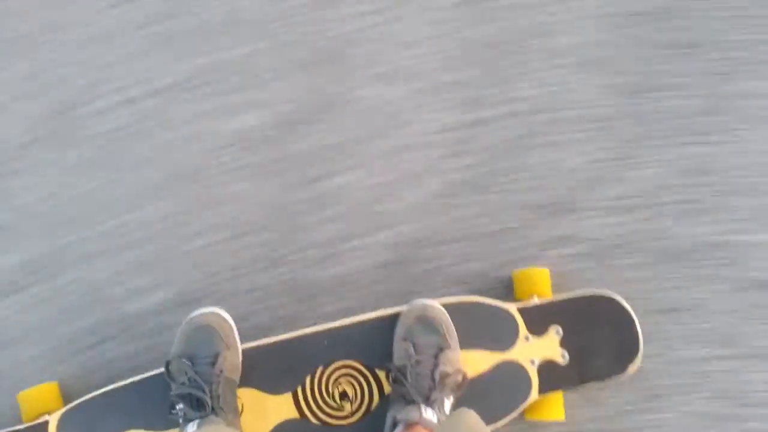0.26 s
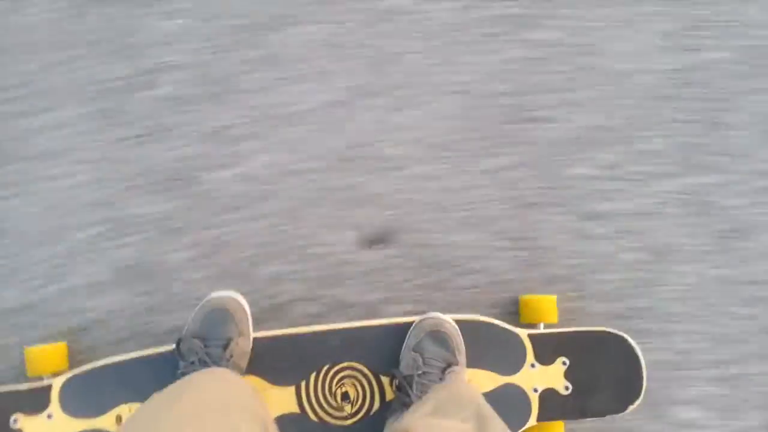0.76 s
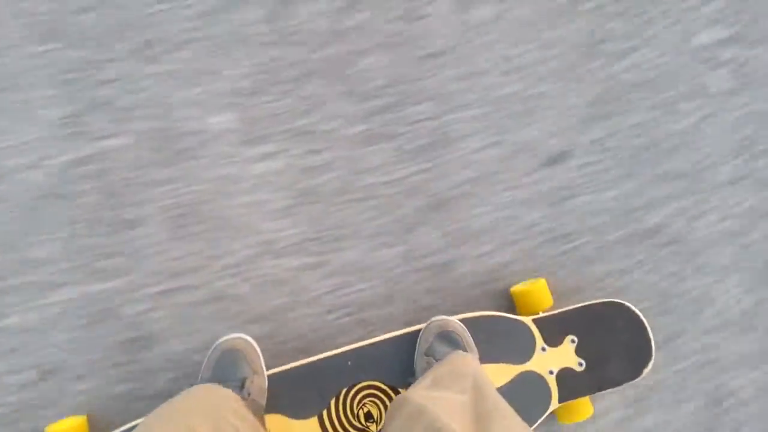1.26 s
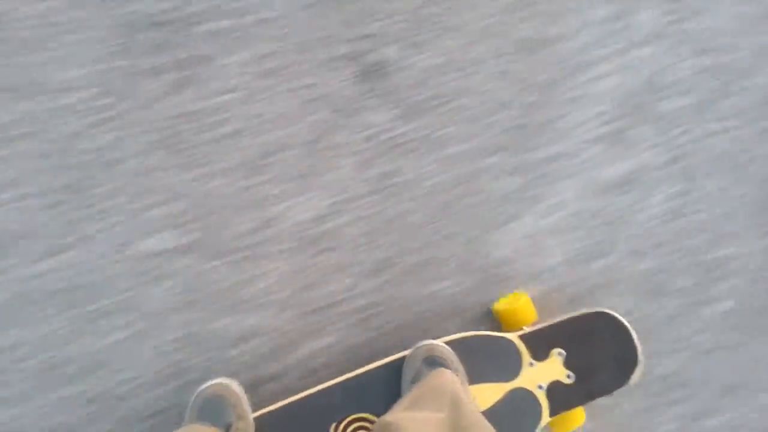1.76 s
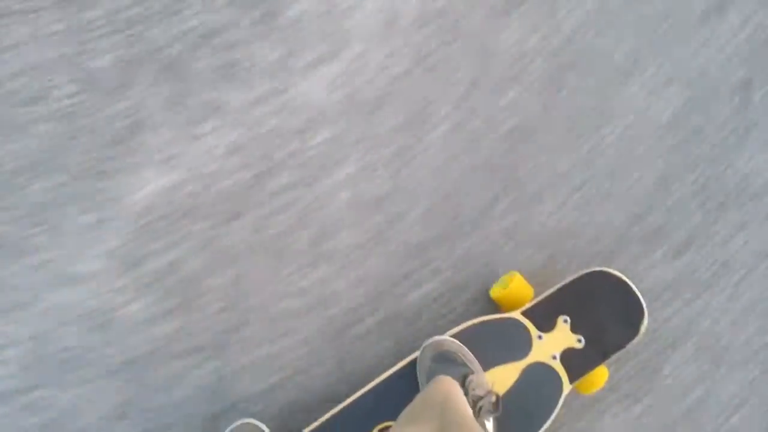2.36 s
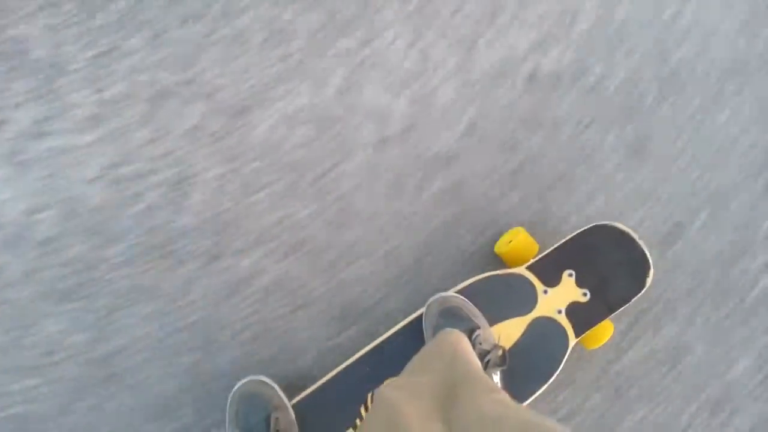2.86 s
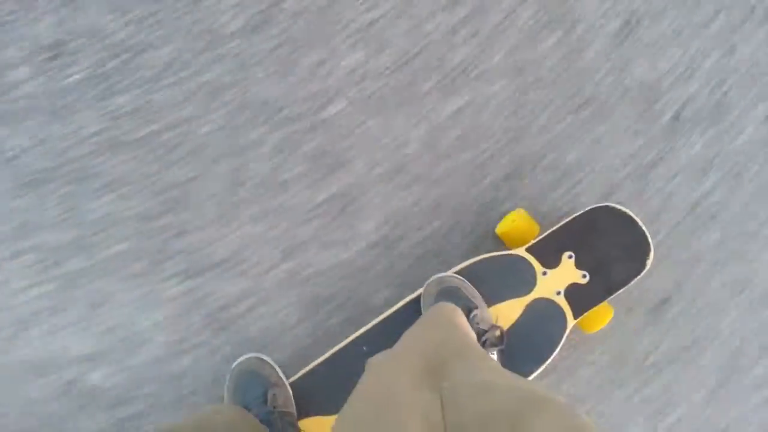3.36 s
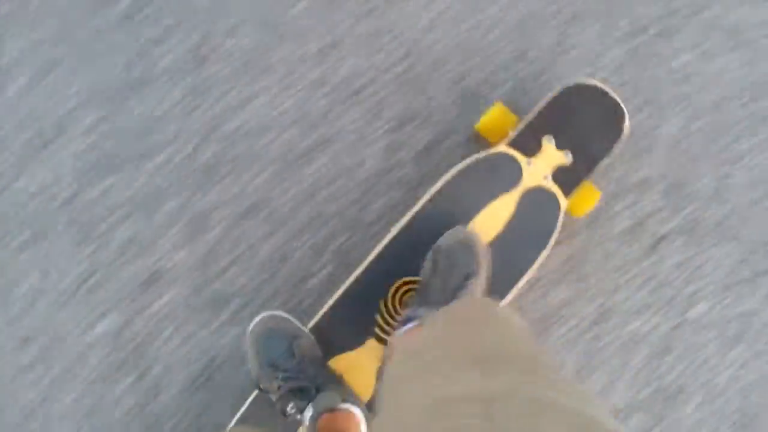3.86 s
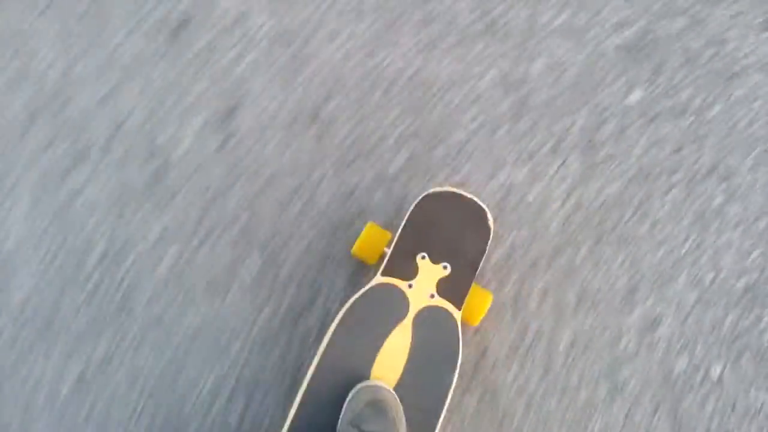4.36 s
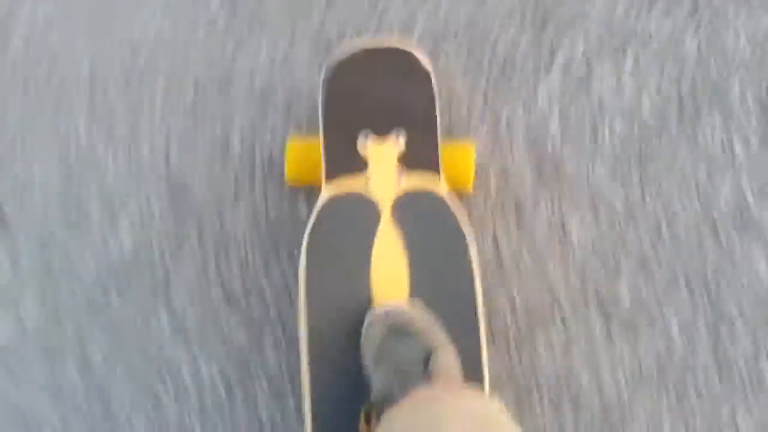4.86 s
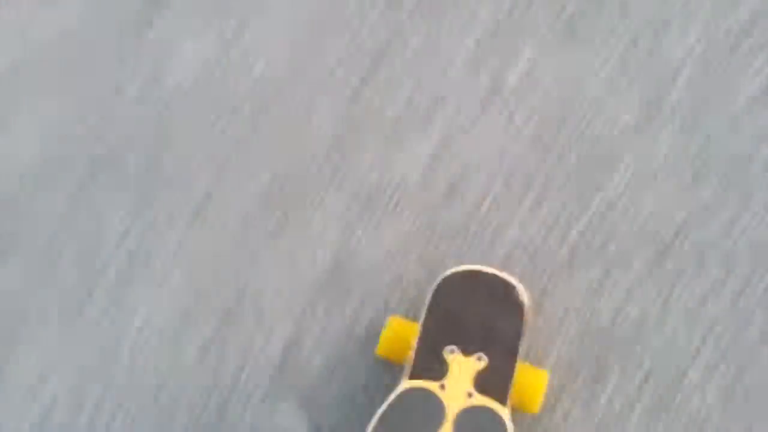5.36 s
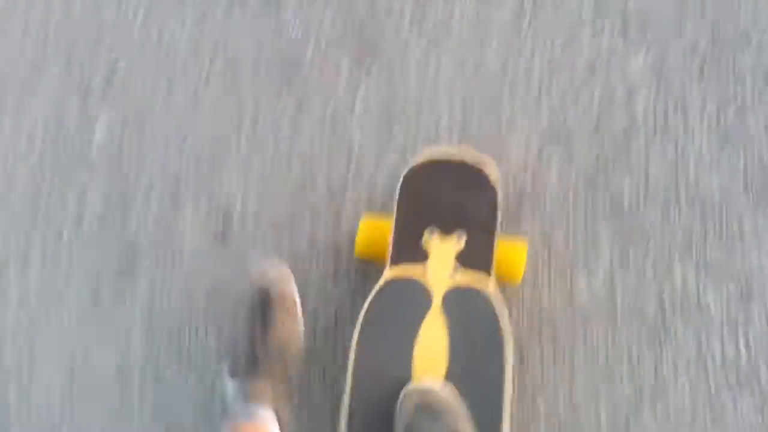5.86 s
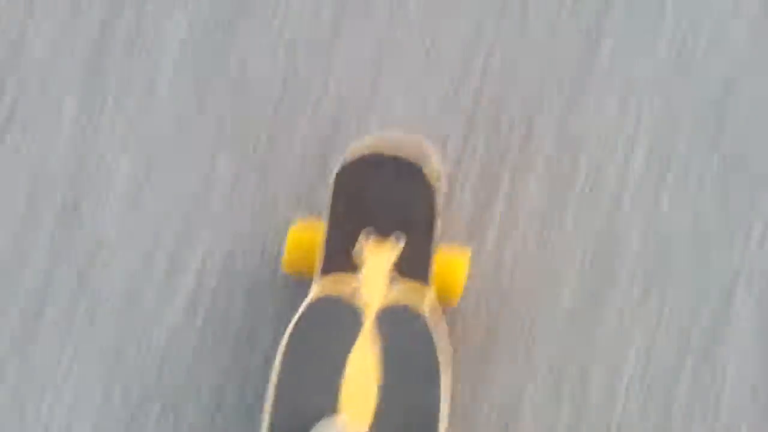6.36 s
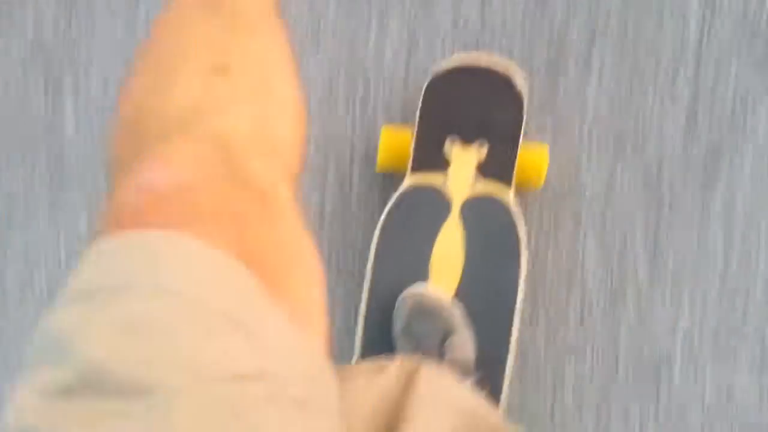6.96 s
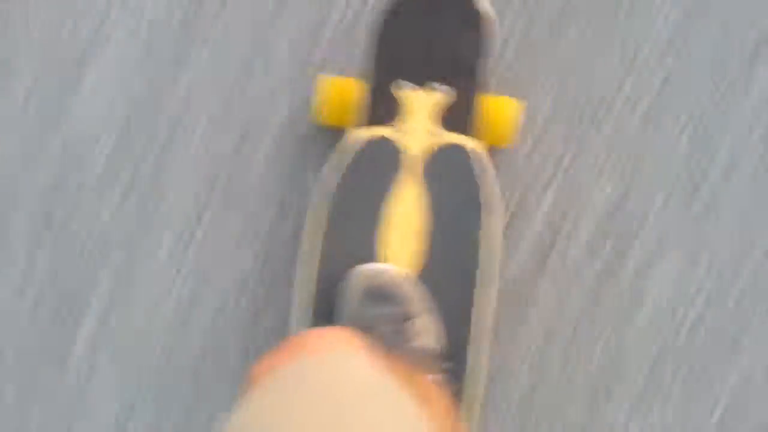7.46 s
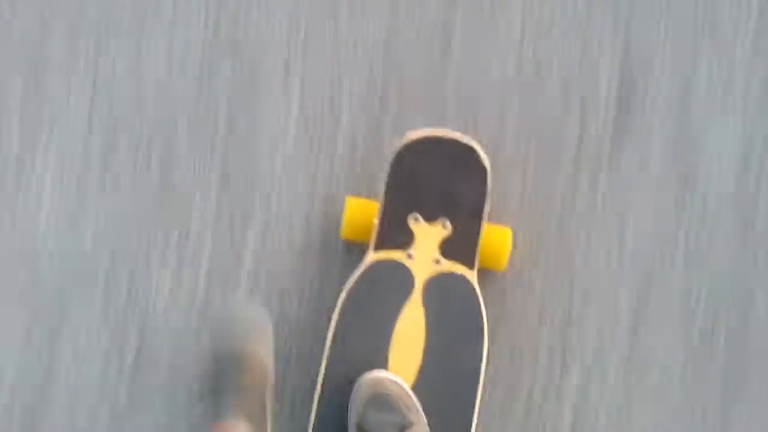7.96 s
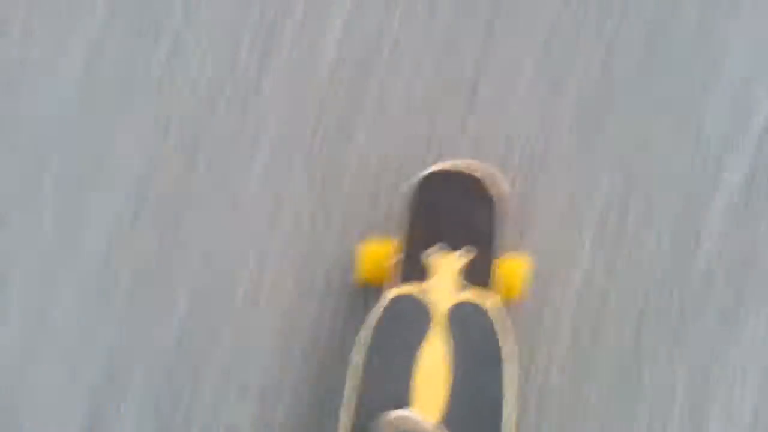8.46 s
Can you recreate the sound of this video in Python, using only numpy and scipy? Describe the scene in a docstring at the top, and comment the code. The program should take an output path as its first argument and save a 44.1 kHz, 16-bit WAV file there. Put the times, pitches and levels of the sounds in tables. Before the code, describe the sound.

Close outdoor sound of a longboard rolling fast over coarse asphalt. A hollow, grainy rumble with wheel growl and thin bearing hiss carries rattling trucks, dry knocks and a hard clack near two seconds, then crackling grit through a leaning carve. Around four seconds it drops quieter with a short rubbery shoe scrape, then surges with each foot push, growing louder to the end.

```python
"""Longboard on rough asphalt

A longboard rolls fast, heard from the rider's hand: a long carve, then straight on with pushes of one foot.
Random stone hits, filtered, make the deck's roar, the wheels' growl and the bearings' hiss; swelling noise makes booms.
Short bursts and dying tones make bumps, clacks, stones and buzzing trucks; bursts of catches make shoe scuffs.
Grit crackles, cloth swishes and wind buffets as swelling noise. The loudest peaks overload the microphone."""
import sys
import numpy as np
from scipy import signal
from scipy.fft import rfft, irfft, next_fast_len
from scipy.io import wavfile
from scipy.ndimage import uniform_filter1d

SR = 44100
rng = np.random.default_rng(int(sys.argv[2]) if len(sys.argv) > 2 else 0)


def unload_audio(sound):
    """Save the sound as a 16-bit wav file, at the path given as the first command line argument."""
    columns = np.transpose(np.atleast_2d(sound))
    # keep every value between -1 and 1, then stretch to whole-number steps
    steps = np.round(np.clip(columns, -1, 1) * 32767)
    wavfile.write(sys.argv[1], SR, steps.astype(np.int16))


N = 383669   # length in samples

# bumps that set the board chattering: (t/s, shaking level/dB before each layer's share,
# deck ring level/dB before a common cut, ring f/Hz, hold/s)
BUMPS = [(0.218, -11, -8, 314, 0.0049), (0.32, -20.5, -7.5, 310, 0.015), (0.419, -17, -12, 299, 0.017),
         (0.541, -21, -13, 316, .005), (0.679, -11.5, -25, 507, 0.0075), (1.694, -14.5, -7, 542, 0.0073),
         (1.892, -27, -5.5, 442, 0.0057), (2.027, -25, -12, 500, .004), (2.034, -15, -4.5, 548, 0.0048),
         (2.0445, -5.5, -2, 522, 0.011), (2.391, -12, -18, 486, 0.0083), (2.565, -13, -4.5, 500, 0.0085),
         (2.938, -16, -30, 487, 0.05), (4.347, -22, -11, 392, 0.022), (4.793, -18, -6.5, 654, 0.0088),
         (5.006, -10, -31, 680, 0.0073), (5.03, -19, -11.5, 699, 0.02), (5.415, -17, -14.5, 690, 0.031),
         (5.5, -31, -15.5, 413, 0.031), (6.034, -12.5, -7, 566, 0.021), (6.098, -15.5, -11, 569, 0.055),
         (7.047, -18, -21, 396, 0.041), (7.416, -24, -13, 290, 0.025)]
# tone of crushed grit and pebbles: (f/Hz, level/dB per Hz)
STONE_TONE = [(1500, -4.5), (3000, -8.5), (4200, 0.5), (5500, -5), (7400, 1), (9500, -5), (12000, -9.5),
              (15000, -13)]
# tone of loose truck hardware: (f/Hz, level/dB per Hz)
HARDWARE_TONE = [(1500, -0.5), (1850, 9), (2150, 10), (2450, -5), (2900, -6.5), (4500, -9.5), (7500, -24),
                 (10000, -21)]


def from_db(db):
    """Decibels to gain."""
    return 10 ** (np.asarray(db) / 20)


def rms_one(x):
    """Scale to rms 1."""
    return x / np.sqrt(np.mean(x ** 2) + 1e-20)


def in_time(rows):
    """Read each column of a curve at every sample, with straight lines between its points."""
    s, *columns = np.transpose(rows)
    return [np.interp(np.arange(N) / SR, s, c) for c in columns]


def drift(rate_hz):
    """Smooth random wander of rms 1, computed at every 40th sample and joined by straight lines."""
    r = np.exp(-80 * np.pi * rate_hz / SR)
    noise = rng.standard_normal(N // 40 + 2002)
    slow = signal.lfilter([1], [1, -2 * r, r * r], noise)[2000:]   # skip the filter's start
    return np.interp(np.arange(N) / 40, np.arange(len(slow)), rms_one(slow))


def colour(x, spectrum, resonances=()):
    """Causal (minimum-phase) filter from a spectrum with steep ends and added peaks or dips."""
    size = 2 * next_fast_len(len(x) // 2 + 2048)
    hz = np.maximum(np.arange(size // 2 + 1) * SR / size, 1)
    knots, levels = np.transpose(spectrum)
    octaves_outside = np.abs(np.log2(hz / np.clip(hz, knots.min(), knots.max())))
    db = np.interp(np.log(hz), np.log(knots), levels) - np.minimum(36 * octaves_outside, 70)
    for centre, width, peak_db in resonances:
        db = db + peak_db / (1 + (2 * (hz - centre) / width) ** 2)
    # folding the cepstrum makes the filter answer only after its input
    cepstrum = irfft(db * np.log(10) / 20)
    cepstrum[1:size // 2] *= 2
    cepstrum[size // 2 + 1:] = 0
    return irfft(rfft(x, size) * np.exp(rfft(cepstrum)))[:len(x)]


def steady(x, window_s):
    """Hold the running rms at 1, leaving the faster grain."""
    power = uniform_filter1d(x ** 2, max(int(window_s * SR), 8))
    return x / np.sqrt(np.abs(power) + 1e-12)


def impacts(per_s, spread_db):
    """Random tiny impacts; a positive spread makes a few much harder, a negative one makes a few softer."""
    sizes = from_db(spread_db * np.minimum(rng.exponential(1, N), 5))
    signs = rng.choice([-1, 1], N)
    return sizes * signs * (rng.random(N) < per_s / SR)


def add(track, s, sound):
    """Mix a short sound in at time s."""
    at = max(round(s * SR), 0)
    track[at:at + len(sound)] += sound[:N - at]


def hump(s, rise, fall):
    """A smooth rise and fall of height 1 around time s."""
    t = np.arange(N) / SR - s
    return np.exp(-.5 * (t / np.where(t < 0, rise, fall)) ** 2)


def swells(rows):
    """Gain of passing swells whose powers add."""
    return np.sqrt(sum((from_db(db) * hump(s, width, width)) ** 2 for s, db, width in rows))


def struck(hz, t60):
    """One damped mode after a soft contact; peak 1."""
    t = np.arange(SR // 20) / SR
    ring = np.sin(2 * np.pi * hz * t) * from_db(-60 * t / t60) * (1 - np.exp(-t / 0.0015))
    return ring / np.abs(ring).max()


def wind():
    """Moving air buffets the microphone in low lumps, in gusts over a steady draught."""
    # (t/s, level/dB, width/s)
    gust_swells = [(.72, -35.5, 0.11), (1.9, -34.5, 0.95), (3.9, -36.5, 0.2), (7.4, -36, 0.25),
                   (8.22, -28.5, 0.13)]
    draught_db = -46.5
    air = rng.standard_normal(N) * from_db(2.7 * drift(rate_hz=6.2))
    low_tone = [(22, -42), (38, -34), (55, -8.0), (85, -2.5), (120, -4.0), (170, -4.0)]
    lumps = rms_one(colour(air, low_tone))
    return np.hypot(swells(gust_swells), from_db(draught_db)) * lumps


def swish():
    """Cloth slides over cloth as a trouser leg swings past: swelling, filtered noise."""
    # passing leg: (t/s, level/dB, width/s)
    leg_swings = [(4.93, -46, 0.067), (5.15, -47.5, 0.095)]
    # tone of the cloth: (f/Hz, level/dB per Hz)
    cloth_tone = [(2800, -2), (3900, -2), (4750, 1), (6000, -10)]
    return swells(leg_swings) * rms_one(colour(rng.standard_normal(N), cloth_tone))


def squeaks():
    """The sole's rubber sticks and slips so evenly that it sounds a short, wavering, gliding note."""
    # chirps: (t/s, length/s, peak level/dB, start f/Hz, end f/Hz)
    chirps = [(8.5, 0.0093, -23.5, 3800, 3940), (8.515, 0.0099, -31, 4400, 4750)]
    out = np.zeros(N)
    for s, length, db, start_hz, end_hz in chirps:
        size = int(length * SR)
        waver = 0.07 * rng.standard_normal(size)   # radians per sample
        phase = np.cumsum(2 * np.pi * np.linspace(start_hz, end_hz, size) / SR + waver)
        add(out, s, from_db(db) * signal.windows.hann(size) * np.sin(phase))
    return out


def squawk():
    """The sole judders on the deck at a nearly even beat; each slip rings the rubber's resonances."""
    # one rasp: (t/s, length/s, level/dB, slips per s)
    s, length, db, slips_per_s = (3.8845, .031, -22.5, 280)
    # what the rubber rings with: (f/Hz, level/dB per Hz)
    rubber_tone = [(700, -5), (1200, 3.5), (1550, -5), (2000, 1), (2300, 8.5), (2850, 2), (3350, -15),
                   (3950, -6), (4800, -17), (5500, -23), (8000, -20), (12000, -36)]
    fade_db = -14   # loss from start to end
    out, slips = np.zeros(N), np.zeros(N)
    for at in np.cumsum(1 + .08 * rng.standard_normal(12)) / slips_per_s:
        add(slips, at, np.ones(1))
    size = int(length * SR)
    rasp = colour(slips[:size] + from_db(-18) * rng.standard_normal(size), rubber_tone)
    shape = signal.windows.tukey(size, .25) * from_db(np.linspace(0, fade_db, size))
    add(out, s, from_db(db) * rms_one(rasp * shape))
    return out


def scuffs():
    """A sole slips in quick tiny catches that ring the rubber's few broad resonances."""
    # (t/s, length/s, level/dB before the soft ends, pitch f/Hz, squeak level/dB)
    rubs = [(3.744, 0.071, -40.5, 3200, -3), (3.879, 0.005, -24, 900, -6), (4.341, 0.0062, -36, 3000, 2),
            (6.161, 0.073, -42.5, 5500, -3), (6.222, 0.029, -35, 3200, -4.5), (8.435, 0.11, -31.5, 1820, 3),
            (8.487, 0.03, -35, 4940, 9)]
    out = np.zeros(N)
    for s, length, db, hz, squeak_db in rubs:
        size = int(length * SR)
        catches = rng.standard_normal(size) * (rng.random(size) < 2500 / SR)   # 2500 per second
        peaks = [(hz * ratio, hz / 8, squeak_db) for ratio in (1, 1.21, 1.65)]
        rub_tone = [(hz / 4.6, -6), (hz, 0), (hz * 1.55, -8), (hz * 2.0, -17), (hz * 4, -22)]
        rub = rms_one(colour(catches, rub_tone, peaks))
        add(out, s, from_db(db) * rub * signal.windows.tukey(size, .6))
    return out


def ping():
    """A flung chip of stone rings the bright modes of a metal truck."""
    # (f/Hz, level/dB, time to fall 60 dB/s)
    metal_modes = [(1600, -28.5, .006), (2100, -32, 0.049), (2720, -35, .016), (3380, -29, 0.02)]
    out = np.zeros(N)
    add(out, 7.717, sum(from_db(db) * struck(hz, t60) for hz, db, t60 in metal_modes))
    return out


def pebbles():
    """A stone pinched under a wheel snaps out with a crack and a short splintering tail."""
    # (t/s, peak level/dB before the common gain, treble lift/dB before a common cut)
    snaps = [(0.232, -27, -6), (0.31, -18, -13), (0.672, -25, -19), (.956, -24, 4), (1.089, -25, -5),
             (1.1923, -24, 3), (1.466, -25, -3), (1.481, -29, 2), (1.7105, -20, -4), (1.764, -11, -16),
             (1.7878, -23, 1), (1.802, -27, 1), (1.807, -12, 5), (1.94, -17, -9), (2.032, -13, -20),
             (2.043, -8, -8), (2.136, -14.5, -19), (2.21, -26, -6), (2.424, -18, 2), (2.51, -15.5, 22),
             (2.515, -23, -8), (2.523, -19, -6), (2.984, -23, -8), (2.997, -19, -4), (3.0908, -13, 10),
             (3.306, -21, 14), (3.572, -22, 21), (3.606, -13, -5), (3.654, -19, 15), (4.3944, -26, -3),
             (4.9964, -5, 13), (5.001, -11.5, 12), (5.4177, -7.5, -4.5), (5.916, -19.5, 3),
             (6.033, -16, -20), (6.1135, -24, 8), (6.129, -28, 8), (6.315, -26, 6), (6.659, -26, 6),
             (7.056, -12, 13.5), (7.265, -23, -19), (7.608, -29, 10), (7.962, -20, 1), (8.0678, -20, 10),
             (8.1913, -24, 3), (8.468, -20, -15), (8.487, -17, -17), (8.553, -18, -15)]
    common_gain_db, treble_cut_db = -5, 7.0
    t, out = np.arange(SR // 25) / SR, np.zeros(N)
    for s, db, top_db in snaps:
        fading = np.exp(-t / 0.00091) + from_db(-13.0) * np.exp(-t / 0.0054)   # crack, then tail
        crack = rng.standard_normal(len(t)) * fading
        crack = colour(crack, STONE_TONE, [(12800, 8600, top_db - treble_cut_db)])
        add(out, s, from_db(db + common_gain_db) * crack / np.abs(crack).max())
    return out


def grit():
    """Loose grains crack in clumps under the leaning wheels, most as these slip sideways."""
    # sideways slips: (t/s, level/dB, width/s)
    sideways_slips = [(1.805, -33, 0.029), (1.88, -44.5, 0.26), (2.18, -41.5, 0.09), (2.6, -50, 0.39),
                      (3.16, -44.5, 0.12), (3.6, -59, .04)]
    loose_grit_db = -72   # grit that is crushed all along
    cracks = impacts(per_s=1000, spread_db=3.8) * from_db(4.0 * drift(rate_hz=90))
    level = np.hypot(swells(sideways_slips), from_db(loose_grit_db))
    return level * steady(colour(cracks, STONE_TONE), .09)


def knocks():
    """A wheel meets a proud stone: a dry tock, a spurt of buzz from the truck and a thump of the deck."""
    # (t/s, tock level/dB, deck thump peak level/dB)
    proud_stones = [(.045, -26, -14), (.159, -35, -9), (.253, -27, -8), (.289, -14, -20), (.421, -28, -16),
                    (0.504, -16, -25), (0.747, -33, -13), (0.785, -32, -14), (.882, -32, -9.5),
                    (.938, -38, -13), (1.017, -26, -6.5), (1.394, -36, -13), (1.996, -25, -24),
                    (2.267, -16, -16), (2.333, -32, -24), (2.393, -23, -18), (2.418, -14.5, -24),
                    (2.476, -22, -10.5), (2.501, -16, -8), (2.533, -15, -20), (2.624, -11.5, -10),
                    (2.661, -19, -17), (2.753, -15, -6), (2.912, -16.5, -28), (2.974, -16, -22),
                    (3.04, -14, -12), (3.416, -20, -12), (3.562, -18, -8.5), (4.737, -17.5, -23),
                    (4.778, -28, -16), (4.807, -20, -16), (4.876, -25, -19), (6.099, -13, -8),
                    (6.14, -12, -21), (6.321, -16, -17), (6.453, -33, -14.5), (6.873, -34, -17),
                    (7.43, -22, -13), (8.01, -28, -7.5), (8.105, -35, -11), (8.205, -18, -3),
                    (8.46, -16, -28)]
    tock_hz, tock_scatter = 886, 0.045   # middle pitch; scatter as a natural logarithm
    buzz_db = -13.5   # against the tock
    t, out = np.arange(SR // 20) / SR, np.zeros(N)
    spurt = (1 - np.exp(-t / 0.0014)) * np.exp(-t / 0.0021)
    for s, db, thump_db in proud_stones:
        hz = tock_hz * np.exp(tock_scatter * rng.standard_normal())
        tock = struck(hz, t60=0.0093) + from_db(-4.5) * struck(hz * 1.68, t60=0.002)
        buzz = spurt * rms_one(colour(rng.standard_normal(len(t)), HARDWARE_TONE))
        add(out, s, from_db(db) * (tock + from_db(buzz_db) * buzz))
        thump_hz = 490 * np.exp(0.12 * rng.standard_normal())
        add(out, s + 0.0012, from_db(thump_db) * struck(thump_hz, t60=0.027))
    return out


def shakes():
    """A hard shake sets washers and nuts chattering for a few milliseconds."""
    # single shakes: (t/s, level/dB, length/s)
    hard_shakes = [(.002, -31, 0.01), (0.027, -37, 0.0093), (.038, -32.5, 0.01), (0.073, -36, 0.015),
                   (0.096, -33.5, .014), (0.122, -33.5, 0.015), (0.176, -31.5, 0.0095), (0.185, -40, .007),
                   (0.21, -31, 0.0064), (0.227, -30, 0.0088), (.254, -30, .007), (0.288, -31, 0.01),
                   (0.303, -41, 0.0057), (0.326, -33, 0.008), (0.335, -30, 0.012), (0.353, -31, 0.012),
                   (0.387, -32, .008), (0.407, -29, 0.0066), (0.42, -30, 0.0079), (0.484, -30, 0.0065),
                   (0.502, -27.5, 0.006), (0.516, -37, .006), (0.678, -36, 0.01), (2.16, -34, 0.0096),
                   (2.269, -31, 0.0085), (2.509, -35, 0.012), (2.575, -47, .01), (2.91, -39, 0.0053),
                   (2.983, -31.5, 0.0072), (4.356, -35.5, 0.0083), (4.707, -38, 0.0093), (4.735, -46, .007),
                   (4.788, -31, 0.0078), (4.843, -31, .005), (5.035, -44, .012), (5.075, -25.5, 0.0036),
                   (5.97, -32, .005), (6.029, -28, 0.005), (6.047, -29.5, .006), (6.117, -35, .006),
                   (6.139, -34, .005), (6.171, -32, .005)]
    edge_s, treble_lift_db = 0.001, 4.5   # how fast a shake starts and stops
    touches_per_s = 740   # tiny contacts within a shake
    t, out = np.arange(SR // 25) / SR, np.zeros(N)
    for s, db, length in hard_shakes:
        shape = (1 - np.exp(-t / edge_s)) * np.exp(-np.maximum(t - length, 0) / edge_s)
        touches = rng.choice([-1, 1], len(t)) * (rng.random(len(t)) < touches_per_s / SR)
        chatter = colour(touches, HARDWARE_TONE, [(7050, 5000, treble_lift_db)])
        add(out, s, from_db(db) * shape * rms_one(chatter))
    return out


def rattle():
    """Washers buzz faintly in short bursts as the trucks shake at an uneven beat."""
    # buzz of the trucks: (t/s, level/dB)
    buzz_level = [(0, -42), (.42, -51), (.72, -55), (1.2, -60), (8.7, -52)]
    spurts_per_s, spurt_decay_s, between_spurts_db = 30, 0.0039, -16
    rattle_db, = in_time(buzz_level)
    t, shaking = np.arange(SR // 20) / SR, np.full(N, from_db(between_spurts_db))
    for s in np.cumsum(rng.uniform(.3, 1.7, size=1000)) / spurts_per_s:
        if s < N / SR - t[-1]:
            add(shaking, s, (1 - np.exp(-t / 0.0007)) * np.exp(-t / spurt_decay_s))
    buzz = impacts(per_s=1500, spread_db=2.5) * shaking * from_db(2 * drift(rate_hz=70))
    return from_db(rattle_db) * steady(colour(buzz, HARDWARE_TONE), .15)


def clacks():
    """Board and trucks make hard contact: a crack, a ring of a few cycles and a brief duller clatter."""
    # (t/s, level/dB, pitch f/Hz, time to fall 60 dB/s of the lowest mode,
    # brightness/dB per octave, clatter level/dB, top edge f/Hz)
    contacts = [(2.0438, -15, 2050, 0.007, -4, 0, 4800), (2.0455, 12, 444, 0.026, -37, -20, 3400),
                (4.3612, -6, 457, 0.011, -14.5, -29, 2340), (4.6124, -2, 1680, 0.0018, -22, -17, 2270),
                (4.799, -8, 700, 0.015, -11, -16, 2400), (4.997, -6, 740, 0.0036, -1, -4.5, 2100),
                (5.0139, -1.5, 400, 0.012, -17, -22, 2000), (5.4198, -5.5, 966, 0.011, -13, -6, 2500),
                (5.9735, -19, 1600, .003, -14, -8, 2400), (6.032, -9, 605, 0.0091, -9.5, -10, 2600),
                (6.3203, -14.5, 1840, 0.004, -27, -10, 2180), (7.2648, -6, 860, 0.0044, -5.5, -17, 3220),
                (8.4328, -6, 907, 0.0053, 2.5, -5.5, 3700), (8.5366, -8.5, 2020, 0.00083, -3, -12.5, 3130)]
    # modes: (ratio to the pitch, level/dB before the brightness)
    ring_modes = [(1, -0.5), (1.72, -9.5), (2.5, -4), (3.6, -8)]
    crack_db, crack_decay_s = -5.5, 0.00067   # the crack fills the gaps between the modes
    t, out = np.arange(SR // 20) / SR, np.zeros(N)
    for s, db, hz, t60, bright_db, clatter_db, top_hz in contacts:
        ring = 0
        for k, (ratio, mode_db) in enumerate(ring_modes):
            mode_gain = (-1) ** k * from_db(mode_db + bright_db * np.log2(ratio))
            ring = ring + mode_gain * struck(hz * ratio, t60 / np.sqrt(ratio))   # higher modes die sooner
        crack = from_db(crack_db) * rng.standard_normal(len(t)) * np.exp(-t / crack_decay_s)
        clatter_top_db = -6.5 + 2 * min(bright_db - 7, 0)
        clatter_tone = [(hz / 5.6, -2), (hz, 0), (hz * 1.37, -4), (hz * 4, clatter_top_db)]
        clatter = rms_one(colour(rng.standard_normal(len(t)), clatter_tone))
        clatter *= (1 - np.exp(-t / 0.00023)) * np.exp(-t / 0.0067)
        softness = signal.butter(6, top_hz, fs=SR, output="sos")   # a soft contact limits the treble
        contact = crack + ring + from_db(clatter_db) * clatter
        add(out, s, from_db(db) * signal.sosfilt(softness, contact))
    return out


def jolt_shape(hold):
    """A bump rises at once, chatters on and dies away."""
    t, decay_s = np.arange(SR // 4) / SR, 0.018
    return (1 - np.exp(-t / 0.00077)) * np.exp(-np.maximum(t - hold, 0) / decay_s)


def deck_ring():
    """Each bump also rings one hollow note of the deck, shaken by the road."""
    common_cut_db = 4.5
    out = np.zeros(N)
    for s, _, db, hz, hold in BUMPS:
        shape = jolt_shape(hold)
        phase = np.cumsum(2 * np.pi * hz / SR + 0.028 * rng.standard_normal(len(shape)))
        add(out, s, from_db(db - common_cut_db) * shape * np.sin(phase))
    return out


def boom():
    """Under the rider's full weight the road drives the deck's low bending note: a narrow band of noise."""
    # heavy loads: (t/s, level/dB, width/s)
    heavy_loads = [(.5, -22, 0.12), (1.12, -20, 0.064), (4.85, -17.5, 0.037), (7.34, -17, 0.051),
                   (7.48, -18.5, 0.076), (8.44, -18, 0.052), (8.63, -13, 0.08)]
    hz, skirt_db = 286, -18.5   # the note; the level half an octave to either side
    note = [(hz / np.sqrt(2), skirt_db), (hz / 1.26, 0), (hz * 1.13, 0), (hz * np.sqrt(2), skirt_db)]
    return swells(heavy_loads) * steady(colour(rng.standard_normal(N), note), .04)


def jolt_gains():
    """Extra rumble, hollow rumble, growl and hiss from the bumps."""
    # share of a bump in each of these four layers: level/dB
    layer_shares = [-2, -5, -17, -29.5]
    shaking = np.zeros(N)
    for s, db, _, _, hold in BUMPS:
        add(shaking, s, from_db(db) * jolt_shape(hold))
    return [from_db(share_db) * shaking for share_db in layer_shares]


def ride():
    """Levels in dB of the rumble and the upper roar: the carve, then pushes that build up speed."""
    # carve over changing asphalt: (t/s, rumble level/dB before a common trim,
    # coarseness/dB: upper roar against rumble)
    carve = [(0, -15.5, -5.5), (0.3, -14, -6.5), (0.6, -13, -9.5), (0.8, -14.5, -15), (1.2, -17.5, -16.5),
             (1.58, -17, -14), (1.98, -17.5, -10.5), (2.12, -15, -9.5), (2.55, -16.5, -7),
             (3.0, -16.5, -8.5), (3.48, -21, -8), (3.85, -16, -16), (4.05, -26, -14.5), (4.3, -27, -13.5),
             (4.55, -26, -12)]
    # each push leaves the board faster, and the roar surges as the weight comes back on:
    # (t/s of the crest, lasting gain/dB, surge/dB, rise/s, fall/s)
    foot_pushes = [(4.79, 4.5, 6, 0.066, 0.4), (6.07, 1.5, 4, 0.17, 0.14), (7.4, 3.5, 5, 0.36, 0.17),
                   (8.3, 2.5, 2, 0.35, 0.9)]
    lead_s, speed_rise_s = 0.095, 0.35   # the speed grows this long before the crest, this quickly
    straight_coarse_db, coarse_per_surge_db = -12.5, 0.32   # coarseness after the carve; its rise with surges
    patchy_db, patches_hz = 1.13, 6.4   # the asphalt is patchy
    t = np.arange(N) / SR
    rumble_db, coarse_db = in_time(carve)
    coarse_db = np.where(t < carve[-1][0], coarse_db, straight_coarse_db)
    for s, gain_db, surge_db, rise, fall in foot_pushes:
        surge = surge_db * hump(s, rise, fall)
        speed_up = (1 + np.tanh((t - s + lead_s) / speed_rise_s)) / 2   # from 0 to 1
        rumble_db = rumble_db + surge + gain_db * speed_up
        coarse_db = coarse_db + coarse_per_surge_db * surge
    rumble_db = rumble_db + patchy_db * drift(patches_hz)
    return rumble_db, rumble_db + coarse_db


def rolling(rumble_db, upper_db):
    """Stone tips hit the wheels: the deck rumbles, the wheels growl, the bearings hiss."""
    # how the board lies to the microphone: (t/s, angle/radians from side-on towards end-on)
    board_heading = [(0, 0.34), (.6, 0.29), (1.0, 0.19), (1.7, 0.11), (3.6, 0.027), (4.0, 0.41),
                     (4.6, 1.45), (8.7, 1.3)]
    # deck from its side, as while carving, and from behind, as while pushing: (f/Hz, level/dB per Hz)
    deck_side = [(53, -42.5), (90, -23), (134, -24), (200, -9.5), (251, -8), (291, -2.5), (433, 2),
                 (534, -1), (883, -19.5), (1100, -28), (1430, -40), (2420, -120)]
    deck_rear = [(41, -63), (70, -37), (115, -7), (267, 3.5), (390, 2.5), (437, -1.5), (474, 2.5),
                 (557, 0.5), (604, 2), (670, 2.5), (752, -14.5), (854, -15), (1100, -20.5), (1430, -45.5),
                 (2420, -120)]
    # deck resonances with one foot off: (f/Hz, width/Hz, lift or dip/dB)
    deck_resonances = [(271, 350, 0.5), (580, 128, -10), (705, 68, 2), (770, 22, -2)]
    # wheels from the side and from behind: (f/Hz, level/dB per Hz)
    wheels_side = [(440, -21), (750, -8.5), (821, -3.5), (939, -10), (1130, -8), (1250, -14), (1480, -14.5),
                   (1720, -20), (1930, -18.5), (2260, -26.5), (3200, -33.5), (4160, -99), (7040, -120)]
    wheels_rear = [(440, -15.5), (750, -1.5), (862, 1.5), (1110, -7.5), (1240, 1.5), (1420, -14),
                   (1630, -11), (1830, -6), (1930, -5), (2510, -21), (3200, -18.5), (4160, -47),
                   (7040, -120)]
    # bearings: (f/Hz, level/dB per Hz)
    bearing_tone = [(2300, 2), (3000, -2.5), (3400, 1), (4300, 0.5), (5200, -2.5), (6200, -5), (7400, -3),
                    (9200, -10.5), (12000, -23), (15000, -22)]
    # the bearings' whistling resonance: (f/Hz, width/Hz, lift/dB)
    bearing_whistle = [(7420, 570, 4.6)]
    hollow_hz = 553   # where the hollow upper rumble begins
    cruise_db = -17   # roar level at cruising speed, to which growl and hiss are tied
    rumble_trim_db, hollow_trim_db = -1.96, 1
    growl_db, growl_follows = -25.5, 0.91   # level at cruise; dB per dB of upper roar
    hiss_db, hiss_follows = -48, 0.71   # level at cruise; dB per dB of rumble

    heading, = in_time(board_heading)
    side, rear = np.cos(heading), np.sin(heading)
    load = drift(rate_hz=44)   # the wheels bounce, so their grip on the road flutters
    road = impacts(per_s=6000, spread_db=2.0) * from_db(0.66 * load)
    tips = impacts(per_s=1800, spread_db=-1.0) * from_db(2.0 * load + 0.27 * drift(rate_hz=13))
    fine = impacts(per_s=25000, spread_db=4.5) * from_db(1.2 * load)

    deck = side * rms_one(colour(road, deck_side))
    deck = deck + rear * rms_one(colour(road, deck_rear, deck_resonances))
    rumble = signal.sosfilt(signal.butter(5, hollow_hz, "low", fs=SR, output="sos"), deck)
    hollow = signal.sosfilt(signal.butter(5, hollow_hz, "high", fs=SR, output="sos"), deck)
    growl = side * rms_one(colour(tips, wheels_side)) + rear * rms_one(colour(tips, wheels_rear))
    hiss = colour(fine, bearing_tone, bearing_whistle)

    levels_db = (rumble_db + rumble_trim_db,
                 upper_db + hollow_trim_db,
                 growl_db + growl_follows * (upper_db - cruise_db),
                 hiss_db + hiss_follows * (rumble_db - cruise_db))
    out = 0
    for sound, db, jolt in zip((rumble, hollow, growl, hiss), levels_db, jolt_gains()):
        level = from_db(db)
        extra = np.hypot(level, jolt) - level   # a bump adds its power to the rolling
        out = out + level * steady(sound, .09) + extra * steady(sound, .012)
    return out


def scene():
    """Everything in open air, close to one microphone, over a faint even hiss."""
    floor_db = -53.5
    air = wind() + from_db(floor_db) * rng.standard_normal(N)
    rider = scuffs() + squawk() + squeaks() + swish()
    stones = grit() + pebbles() + ping() + knocks()
    board = rolling(*ride()) + boom() + deck_ring() + rattle() + shakes() + clacks()
    return (board + stones + rider + air)[None]


def record(dry):
    """The microphone drops the deepest bass, the loudest peaks clip and the top is cut."""
    bass_cut = signal.butter(2, 44.5, "high", fs=SR, output="sos")   # Hz
    top_cut = signal.ellip(10, .1, 70, 14700, fs=SR, output="sos")   # ripple dB, depth dB, edge Hz
    thinned = signal.sosfilt(bass_cut, dry)
    return signal.sosfilt(top_cut, np.clip(thinned, -1, 1))


dry = scene()
out = record(dry)
unload_audio(out)
```